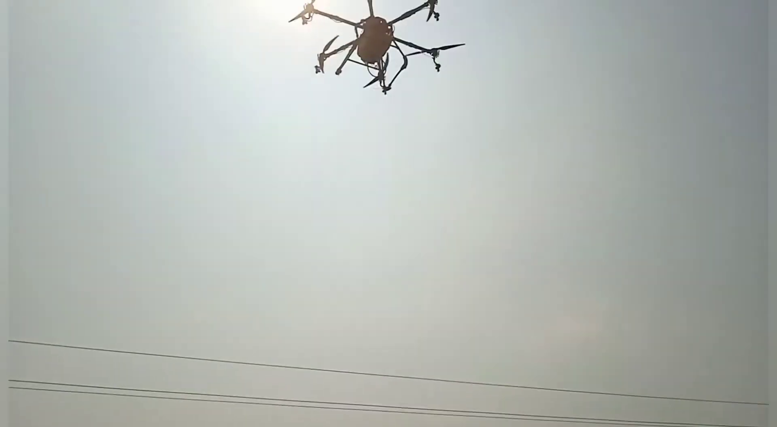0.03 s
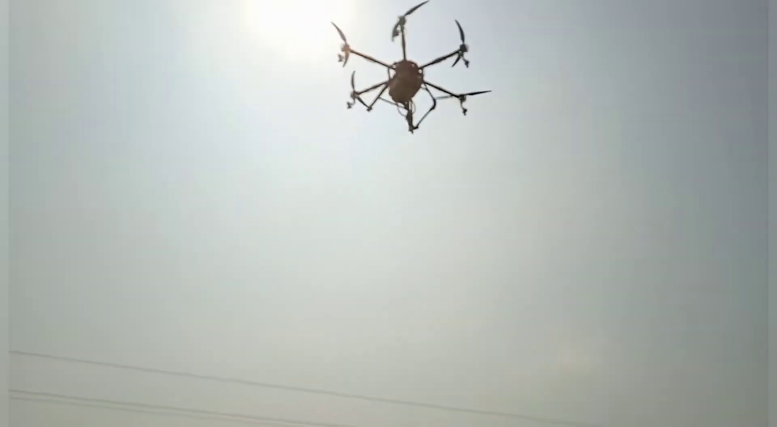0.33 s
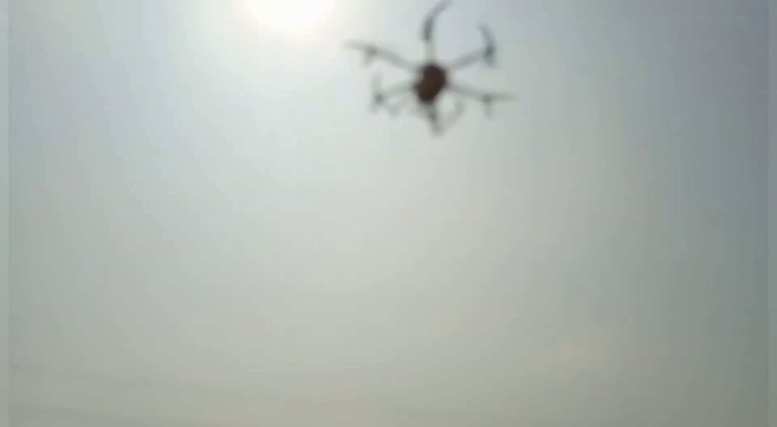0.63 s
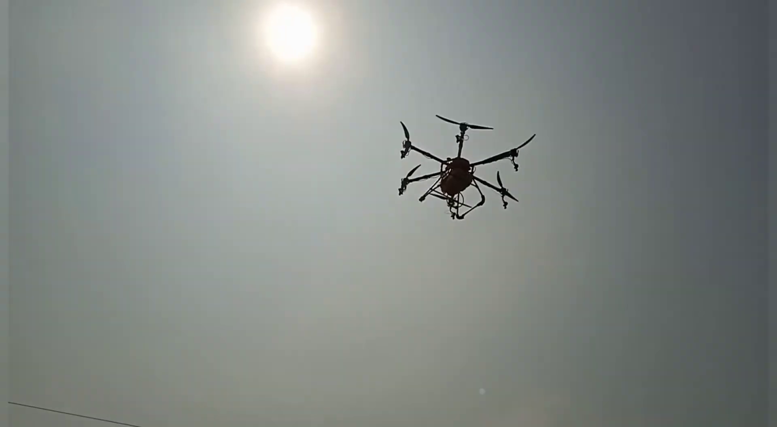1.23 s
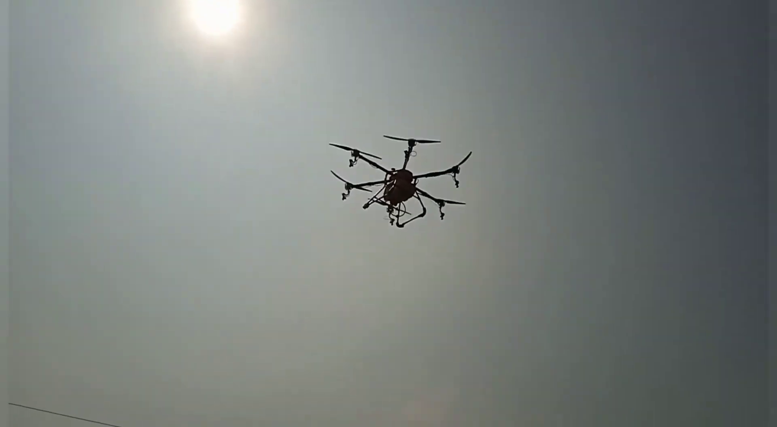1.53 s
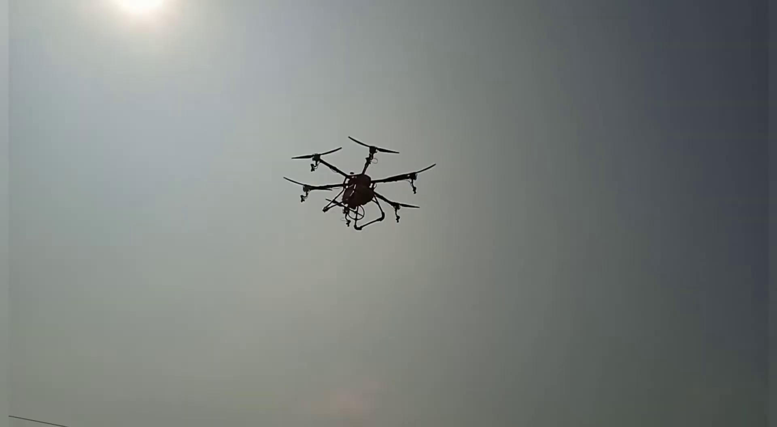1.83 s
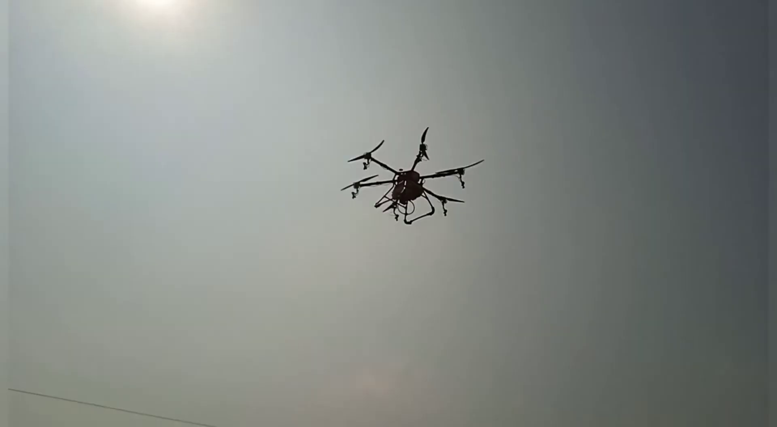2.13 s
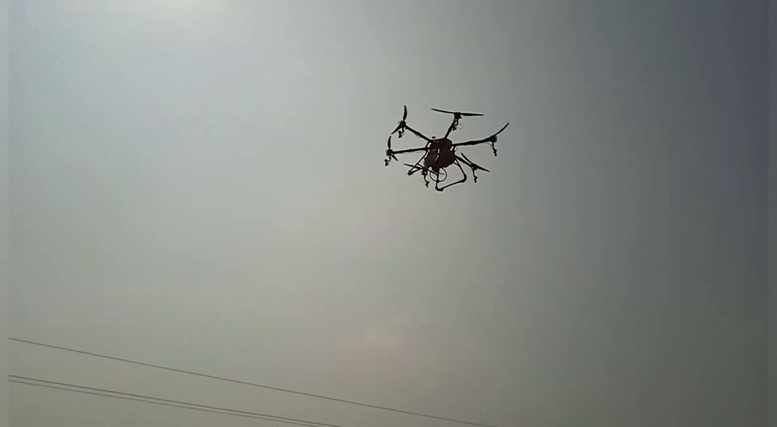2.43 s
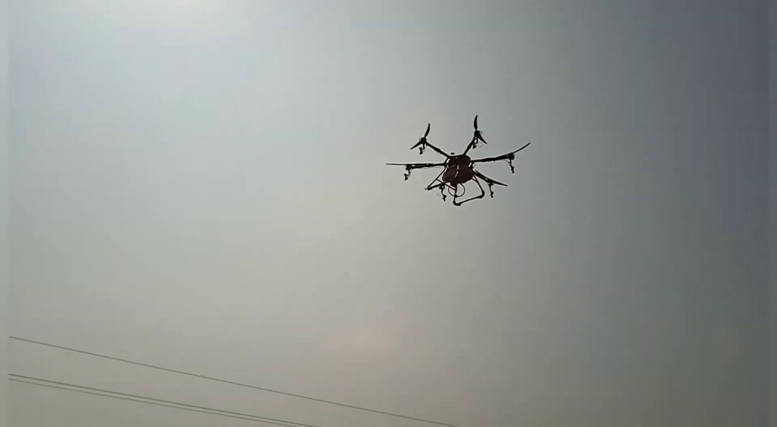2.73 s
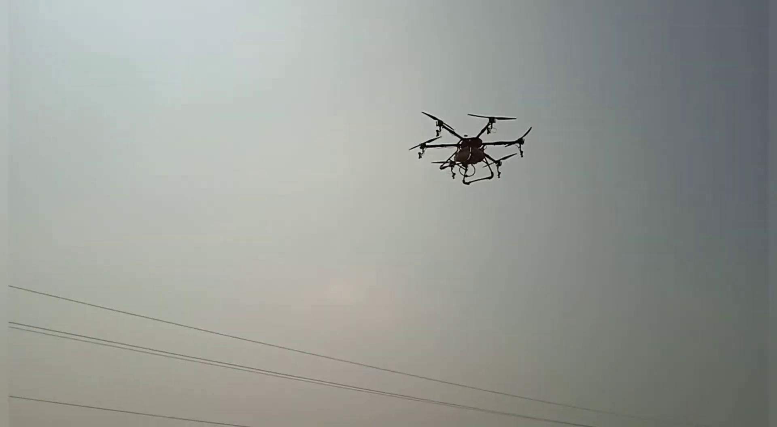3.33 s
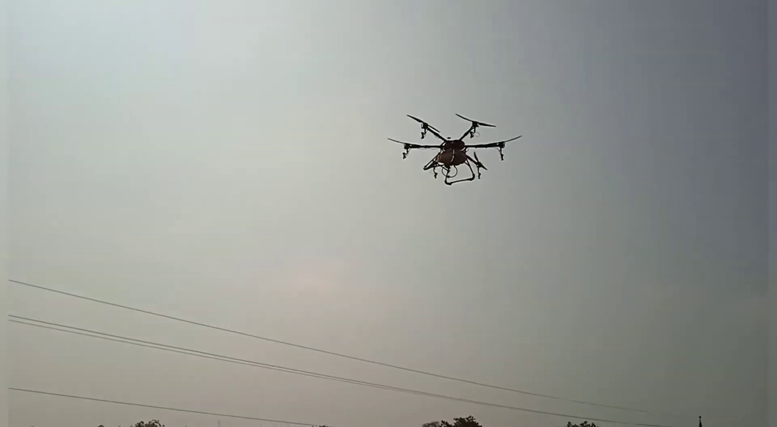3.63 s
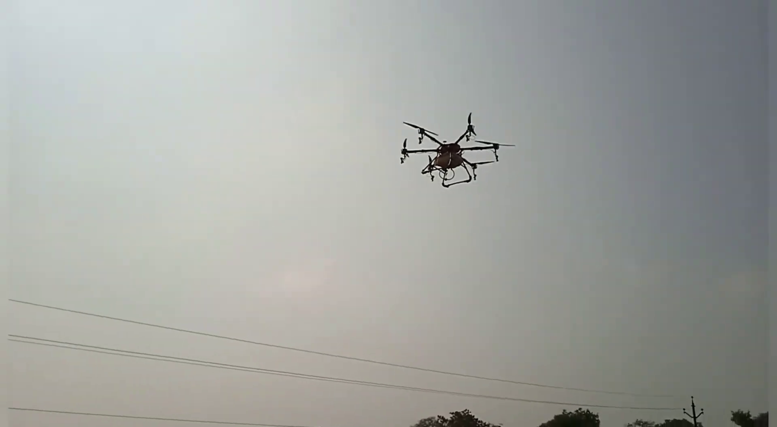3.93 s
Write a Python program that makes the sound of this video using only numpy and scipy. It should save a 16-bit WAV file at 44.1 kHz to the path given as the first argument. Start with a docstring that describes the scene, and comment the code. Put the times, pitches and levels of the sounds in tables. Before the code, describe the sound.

Large drone rotors whirring outdoors with a wavering hum, easing off as it moves away.

```python
"""A large six-rotor drone passes overhead outdoors and drifts away.
From the start each blade sweep throws a swish of air, and the two-bladed rotors hum at their own
speeds, so the tones beat; the motor drives add a thin, very high whistle, the downwash a low rush.
From 0.6 s the drone moves off: the whoosh fades and dulls, the higher tones waver more in the air.
From 2.5 s those tones change colour once more."""
import sys
import numpy as np
from scipy import signal
from scipy.fft import rfft, irfft
from scipy.io import wavfile
from scipy.ndimage import uniform_filter1d

SR = 44100
rng = np.random.default_rng(int(sys.argv[2]) if len(sys.argv) > 2 else 0)


def file_out(sig):
    """Save sig as 16-bit WAV at sys.argv[1]."""
    # one column per channel
    cols = np.atleast_2d(sig).T
    # limit, then scale
    lim = np.clip(cols, -1, 1)
    pcm = np.round(lim * 32767).astype(np.int16)
    wavfile.write(sys.argv[1], SR, pcm)


N = 176400
TIME, FREQ = np.arange(N) / SR, np.fft.rfftfreq(N, 1 / SR)

# (start blade rate [Hz], end blade rate [Hz], start hum [dB], end hum [dB], swish [dB], wander [ratio])
ROTORS = [(83.6, 82.6, 0, 0, 0, .004), (81.4, 82.4, -9, -7, -4, .009), (85, 84.8, -14, -13, -6, .009),
          (76.6, 77.2, -9, -5, -2, .007), (80.2, 79.4, -7, -8, -5, .01), (72.6, 73.8, -7, -7, -2, .007)]
# before band trim (time [s], body [dB], treble [dB], top [dB])
WHOOSH_LEVEL = [(0, -36.5, -46.5, -52.5), (0.4, -33, -46, -52.0), (0.7, -34.5, -47, -54),
                (0.85, -35.5, -48.5, -52.5), (1.15, -36, -47.5, -53), (1.6, -40, -51, -54.5),
                (1.85, -39.0, -50, -54.5), (2.05, -40, -51, -55), (2.55, -39.5, -49.5, -54.5),
                (2.8, -40, -49.5, -54.5), (3.1, -40.5, -51, -55.5), (3.35, -40, -50.5, -56.5),
                (3.55, -42, -53, -56), (3.85, -41, -51.5, -56.5), (4, -43, -52, -57)]
# (upper edge [Hz], trim [dB], pulsed share [0-1])
WHOOSH_BANDS = [(2510, -3, 0.15), (5450, 0, 0.26), (14000, 0, 0.27)]
# spectra (frequency [Hz], gain [dB])
WHOOSH_OVERHEAD = [(310, -3.5), (370, -15), (440, -25), (560, -7), (730, -2), (860, -5.5), (1070, 2.5),
                   (1330, -4.5), (1600, -0.5), (1830, -2), (2030, 0), (2450, -8.5), (3100, -10.5),
                   (4000, -12), (4800, -9), (5400, -19), (6300, -13.5), (8400, -22.5), (10000, -31),
                   (11300, -30), (13000, -33)]
WHOOSH_FAR = [(310, -11), (360, -6), (440, -1), (600, -10.5), (740, -3.5), (860, -16), (1070, -2.5),
              (1330, -4), (1620, -2), (1830, -4.5), (2030, -2.5), (2450, -10), (3100, -17), (4000, -12),
              (4800, -11), (5400, -18), (6300, -18.5), (8400, -19.5), (10100, -33.5), (11200, -29.5),
              (13000, -33)]
# peak shift as the drone tilts and turns (time [s], frequency [ratio])
TILT_SHIFT = [(0, 0.92), (.5, 1.025), (.9, 0.97), (1.3, 1.003), (1.85, 1.086), (2.3, 1.02), (2.7, 1),
              (3.3, 1), (4, 1.01)]
# (centre [s], half length [s], frequency [Hz], glide [Hz/s], half width [Hz], lift [dB])
RASPS = [(0.077, 0.12, 450, 0, 60, 21), (.03, 0.34, 1490, 0, 59, 9), (0.35, 0.19, 1930, 100, 170, 3.5),
         (0.89, 0.21, 2170, 400, 250, 8), (1.33, 0.076, 2180, 100, 100, 9.5),
         (1.25, 0.13, 1430, 0, 150, 5.5), (1.53, 0.11, 1260, 0, 99, 8.5), (1.34, 0.13, 670, 0, 49, 10),
         (1.83, 0.094, 1290, 0, 140, 11), (2.12, 0.09, 1750, -100, 85, 10),
         (2.15, 0.27, 1080, -78, 140, 7.5), (2.72, 0.48, 1620, -26, 150, 6), (3.9, 0.065, 1580, 0, 130, 2),
         (3.74, 0.26, 1530, 200, 110, 4.5), (3.2, 0.067, 4860, 0, 150, 7), (0.22, 0.099, 470, 0, 90, 1),
         (2.6, 0.031, 3600, 0, 1400, 2.5), (2.4, .35, 415, -2, 29, 6.5), (3.05, .3, 690, 0, 45, 7)]
# relative to the body column of WHOOSH_LEVEL (time [s], level [dB])
BUZZ_LEVEL = [(0, 0.5), (.4, -5.5), (1.0, -8), (1.8, -5), (2.6, -4), (4, -4.5)]
# spectra of the higher blade tones (frequency [Hz], gain [dB])
BUZZ_OVERHEAD = [(290, 0), (335, -0.5), (370, 2), (416, 2), (437, 11), (500, 9), (545, 11), (585, 3),
                 (660, 8), (830, -9), (920, 5), (1000, 3.5), (1090, -3), (1300, -6), (1600, 0), (1800, -3),
                 (2000, 2), (2300, -2)]
BUZZ_FAR = [(300, 7), (335, 0.5), (370, -28), (415, 9), (460, 6), (500, -21), (585, 9), (670, 1.5),
            (740, 4), (830, -2.5), (920, 0.5), (1090, 3), (1300, -1.5), (1480, -8), (1680, -4), (1900, 2.5),
            (2300, -6)]
BUZZ_END = [(295, 5), (335, 5.5), (385, 1), (415, -8), (465, 8.5), (497, 3.5), (585, -3), (665, 2.5),
            (745, -6), (830, 0.5), (920, 0.5), (1090, 2), (1300, -9), (1480, -1.5), (1640, 3.5),
            (1850, -3.5), (2300, -20)]
# blade tone 1 before trim (time [s], level [dB])
FUNDAMENTAL_LEVEL = [(0, -57), (.16, -52), (.24, -44.5), (.3, -56), (.4, -56), (.5, -44.5), (.56, -59),
                     (.61, -74), (.73, -55), (.81, -55), (.92, -50.5), (1.04, -62), (1.28, -65),
                     (1.38, -55), (1.56, -56), (1.63, -64), (1.84, -64), (1.93, -61), (2.1, -51),
                     (2.3, -67), (2.4, -56), (2.6, -60), (2.79, -56), (2.94, -67), (3.02, -55), (3.18, -58),
                     (3.26, -71), (3.36, -57.5), (3.55, -60), (3.68, -83), (3.79, -59), (4, -75)]
# before trim and throbs (time [s], tone 2 [dB], tone 3 [dB])
OVERTONE_LEVEL = [(0, -46, -51.5), (.15, -47.5, -47), (.42, -44, -44.5), (.53, -48, -49), (.62, -58, -46),
                  (.74, -49, -50.5), (.86, -52.5, -50), (1.0, -48, -50), (1.2, -51, -52.5),
                  (1.38, -52, -59), (1.53, -46.5, -46), (1.66, -48.5, -51.5), (1.82, -49.5, -57),
                  (1.95, -53, -49), (2.04, -50.5, -61), (2.18, -46.5, -60), (2.3, -53.5, -57.5),
                  (2.45, -47.5, -66), (2.68, -48, -66), (2.8, -54.5, -61), (3, -46.5, -59), (3.3, -52, -56),
                  (3.5, -50.5, -57), (3.66, -57, -58), (3.84, -58.5, -60), (4, -57, -69)]
# tone 2 throbs as rotors fall into step (time [s], lift [dB])
THROBS = [(0.131, 3), (.74, 7), (1.081, -1), (1.27, 5), (1.38, 13.5), (1.9, 3), (2.2, 5), (2.44, 1),
          (2.53, 1.5), (2.99, 2.5), (3.18, 6.5), (3.31, 8.5), (3.5, 5), (3.84, 9)]
# scales rotor hum dB; high favours the loudest (time [s], tone 1 [ratio], tone 2 [ratio], tone 3 [ratio])
ROTOR_LEAD = [(0, 2, 1.2, 1.8), (1.9, 2, 1, 1.6), (2.4, 2, 1, .1), (4, 2, 1, -.6)]
# (frequency [Hz], half width [Hz], start level [dB], end level [dB])
WHISTLES = [(13465, 30, -70, -80), (13680, 40, -80, -80), (13850, 40, -80, -78), (14170, 14, -75, -70),
            (14237, 16, -68, -76), (14340, 24, -74, -78), (15003, 20, -67, -72)]
# motor fizz (frequency [Hz], gain [dB])
FIZZ_SPECTRUM = [(12800, -35), (13350, -1), (14050, 4), (14250, 14), (15150, 7), (15700, 8), (16500, -4)]
# before trim (time [s], level [dB])
FIZZ_LEVEL = [(0, -57), (.7, -55), (1.6, -54), (2.4, -56), (3.1, -57), (4, -58)]
# (frequency [Hz], gain [dB])
DOWNWASH_SPECTRUM = [(15, -14), (35, -12), (55, -9), (100, -7), (125, 0), (180, 2), (220, 6), (265, 3),
                     (330, -8), (400, -20), (1500, -60)]
# (time [s], level [dB])
DOWNWASH_LEVEL = [(0, -51), (.45, -59), (.65, -60), (1.2, -60), (1.8, -67), (2.3, -63), (2.7, -58),
                  (3.1, -63), (3.6, -60.5), (4, -57)]

GUST_HZ, FLUTTER_HZ = 7, 12  # turbulence rates


def whoosh(passes, low_edge_hz=257, shift_top_hz=7000, patch_db=1.9, swell_db=.5):
    """Blade swishes in three bands, changing colour as the drone moves off."""
    frames = dict(nperseg=1024, noverlap=768)
    hz, t, spectra = signal.stft([swish(passes, share) for _, _, share in WHOOSH_BANDS], SR, **frames)
    shift_weight = 1 / (1 + (hz[:, None] / shift_top_hz) ** 6)
    lookup_hz = hz[:, None] / np.interp(t, *np.transpose(TILT_SHIFT)) ** shift_weight
    far = farness(t)
    colour = gain_at(WHOOSH_OVERHEAD, lookup_hz) ** (1 - far) * gain_at(WHOOSH_FAR, lookup_hz) ** far
    colour *= amp(patch_db * eddies(hz, t) + rasps(hz, t))
    below_lower, total = 1 / (1 + (hz / low_edge_hz) ** 10), 0
    for k, (edge_hz, trim_db, _) in enumerate(WHOOSH_BANDS):
        below_upper = 1 / (1 + (hz / edge_hz) ** 20)
        band = np.sqrt(np.maximum(below_upper - below_lower, 0))[:, None]
        air = signal.istft(spectra[k] * colour * band, **frames)[1][:N]
        total += amp(curve(WHOOSH_LEVEL, column=k + 1) + trim_db) * unit(air)
        below_lower = below_upper
    return total * amp(swell_db * drift(FLUTTER_HZ))


def swish(passes, pulsed_share, sharpness=14, uneven_db=4):
    """Air noise flaring once per blade pass, each rotor at its own blade angle."""
    power = 0
    for (*_, swish_db, _), turns in zip(ROTORS, passes):
        gain = amp(swish_db + uneven_db * drift(GUST_HZ))
        power += gain ** 2 * np.exp(sharpness * (np.cos(2 * np.pi * (turns + rng.random())) - 1))
    return np.sqrt(1 - pulsed_share + pulsed_share * power / power.mean()) * rng.standard_normal(N)


def eddies(hz, t, patch_hz=120, patch_s=.05):
    """Random patches over frequency and time; rms 1."""
    across, along = np.fft.fftfreq(len(hz), hz[1])[:, None], np.fft.fftfreq(len(t), t[1])
    blur = np.exp(-(across * patch_hz) ** 2 - (along * patch_s) ** 2)
    return unit(np.fft.ifft2(np.fft.fft2(rng.standard_normal(blur.shape)) * blur).real)


def rasps(hz, t):
    """Narrow peaks that swell and fade in the whoosh; lift in dB."""
    total_db = 0
    for centre_s, length_s, centre_hz, glide_hz_per_s, width_hz, lift_db in RASPS:
        offset_s = t - centre_s
        offset_hz = hz[:, None] - centre_hz - glide_hz_per_s * offset_s
        total_db += lift_db * np.exp(-(offset_s / length_s) ** 2 - (offset_hz / width_hz) ** 2)
    return total_db


def buzz(passes, gust_db=3.5, end_colour_s=2.46, crossfade_s=.8):
    """Blade tones 4-27; turbulence shakes their level and, more so far off, their phase."""
    far, late = farness(TIME), np.clip((TIME - end_colour_s) / crossfade_s, 0, 1)
    depth_turns, tones = np.interp(far, [0, 1], [.06, .23]), 0
    for order in range(4, 28):
        scatter_turns = depth_turns * drift(GUST_HZ)
        for (start_hz, end_hz, hum_db, _, swish_db, _), turns in zip(ROTORS, passes):
            overhead = gain_at(BUZZ_OVERHEAD, order * start_hz)
            distant = (1 - late) * gain_at(BUZZ_FAR, order * end_hz)
            distant += late * gain_at(BUZZ_END, order * end_hz)
            gain = (1 - far) * amp(hum_db) * overhead + far * amp(swish_db) * distant
            gust = amp(gust_db * drift(GUST_HZ))
            tones += gain * gust * np.cos(2 * np.pi * (order * turns + scatter_turns + rng.random()))
    return amp(curve(WHOOSH_LEVEL) + curve(BUZZ_LEVEL)) * unit(tones)


def hum(passes, trim_db=(-1, -1, 1), throb_half_s=.03, imbalance_db=-20.5):
    """Blade tones 1-3; unequal blades add a faint tone between the first two."""
    bumps = [np.exp(-((TIME - time_s) / throb_half_s) ** 2) for time_s, _ in THROBS]
    throb_db = sum(lift_db * bump for (_, lift_db), bump in zip(THROBS, bumps))
    levels_db = [curve(FUNDAMENTAL_LEVEL), curve(OVERTONE_LEVEL) + throb_db, curve(OVERTONE_LEVEL, 2)]
    in_step, tones = [0, np.max(bumps, axis=0), 0], 0
    for k, level_db in enumerate(levels_db):
        tone = blade_tone(passes, order=k + 1, lead=curve(ROTOR_LEAD, k + 1), in_step=in_step[k])
        tones += amp(level_db + trim_db[k]) * tone
    return tones + amp(levels_db[0] + imbalance_db) * blade_tone(passes, order=1.5, lead=.74, in_step=0)


def blade_tone(passes, order, lead, in_step, flutter_db=3, scatter_turns=.035, even_s=.16):
    """One tone of all six rotors, beating and shaken by turbulence; rms 1."""
    tone = 0
    for (_, _, start_db, end_db, _, _), turns in zip(ROTORS, passes):
        gain = amp(lead * np.linspace(start_db, end_db, N) + flutter_db * drift(FLUTTER_HZ))
        phase_turns = order * turns + scatter_turns * drift(FLUTTER_HZ) + rng.random()
        tone += gain * np.exp(2j * np.pi * phase_turns)
    # even out slow beats; while in step, fast ones too
    size, power, held = round(even_s * SR), abs(tone) ** 2, np.clip(in_step, 0, .95)
    slow_power = uniform_filter1d(uniform_filter1d(power, size), size)
    return unit(tone.real / np.sqrt((1 - held) * slow_power + held * power))


def motors(passes, fizz_trim_db=-2.5, swell_db=1):
    """Switching whistles of the motor drives in a band of fizz."""
    whistles = 0
    for centre_hz, width_hz, start_db, end_db in WHISTLES:
        peak = 1 / (1 + ((FREQ - centre_hz) / width_hz) ** 2)
        whistles += amp(np.linspace(start_db, end_db, N)) * shaped(rng.standard_normal(N), peak)
    fizz_db = curve(FIZZ_LEVEL) + fizz_trim_db + swell_db * drift(FLUTTER_HZ)
    fizz = shaped(swish(passes, pulsed_share=.4), gain_at(FIZZ_SPECTRUM, FREQ))
    return whistles + amp(fizz_db) * fizz


def downwash():
    """Low rush of turbulent air."""
    return amp(curve(DOWNWASH_LEVEL)) * shaped(rng.standard_normal(N), gain_at(DOWNWASH_SPECTRUM, FREQ))


def blade_passes(wander_hz=3):
    """Running blade-pass count per rotor; each keeps correcting its speed."""
    return [rng.random() + np.cumsum(np.linspace(start_hz, end_hz, N) * (1 + wander * drift(wander_hz))) / SR
            for start_hz, end_hz, *_, wander in ROTORS]


def farness(t, leave_s=.63, length_s=.71):
    """0 overhead, 1 far off."""
    return np.clip((t - leave_s) / length_s, 0, 1)


def drift(top_hz, size=800):
    """Slow random motion, rolling off at top_hz; rms 1."""
    hz = np.fft.rfftfreq(size, N / SR / size)
    slow = irfft(rfft(rng.standard_normal(size)) * (hz > 0) / (1 + (hz / top_hz) ** 2) ** 2, size)
    return np.interp(TIME, np.linspace(0, N / SR, size), unit(slow))


def shaped(x, gain):
    """Filter by a gain per frequency; rms 1."""
    return unit(irfft(rfft(x) * gain, N))


def gain_at(spectrum, hz):
    """Spectrum table as gain at hz."""
    table_hz, db = np.transpose(spectrum)
    return amp(np.interp(np.log(hz + 1), np.log(table_hz + 1), db))


def curve(rows, column=1):
    """Time table column at every sample."""
    rows = np.asarray(rows, float)
    return np.interp(TIME, rows[:, 0], rows[:, column])


def amp(db):
    """dB to gain."""
    return 10 ** (np.asarray(db) / 20)


def unit(x):
    """Scale to rms 1."""
    return x / np.sqrt(np.mean(x ** 2) + 1e-20)


def scene():
    """The whole drone, mono."""
    passes = blade_passes()
    return (hum(passes) + buzz(passes) + whoosh(passes) + motors(passes) + downwash())[None]


def record(dry):
    """Steep low-pass."""
    edge_hz = 15740
    return signal.oaconvolve(dry, signal.firwin(1023, edge_hz, window=("kaiser", 9), fs=SR)[None], "same")


dry = scene()
out = record(dry)
file_out(out)
```